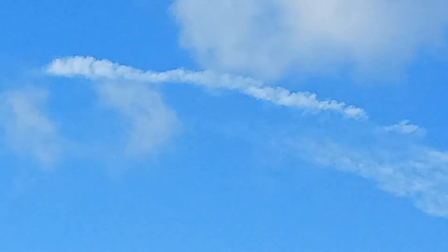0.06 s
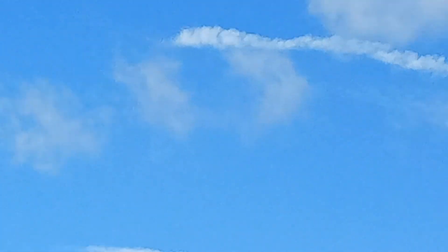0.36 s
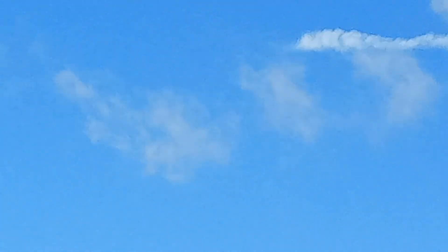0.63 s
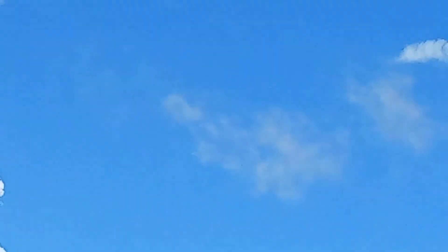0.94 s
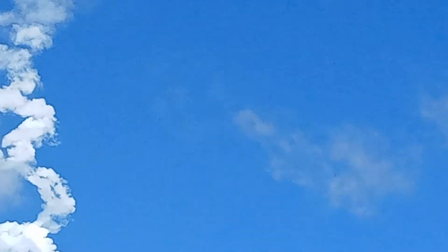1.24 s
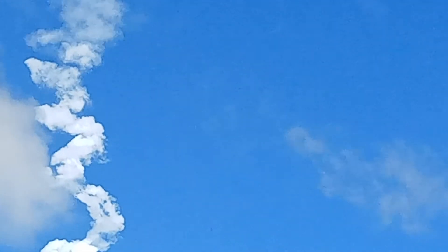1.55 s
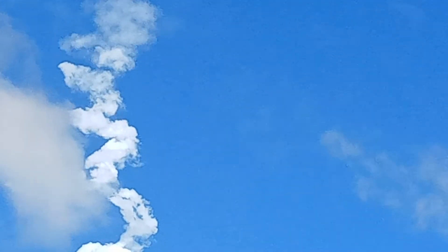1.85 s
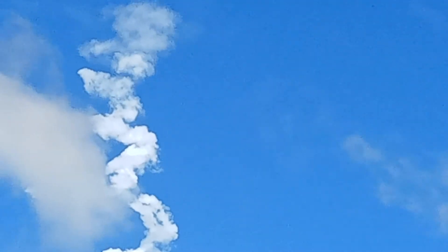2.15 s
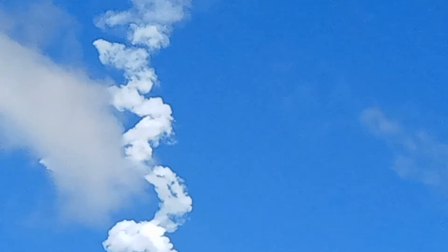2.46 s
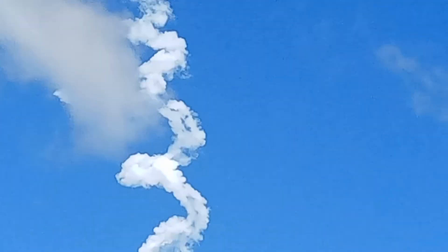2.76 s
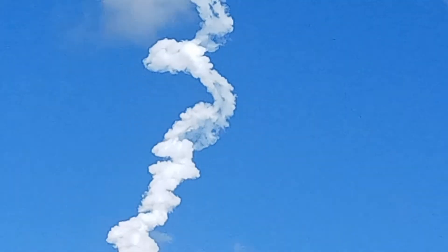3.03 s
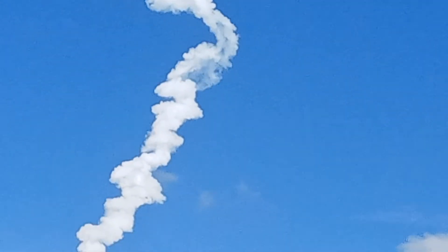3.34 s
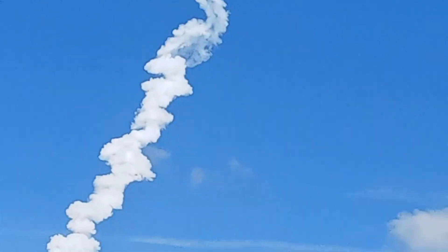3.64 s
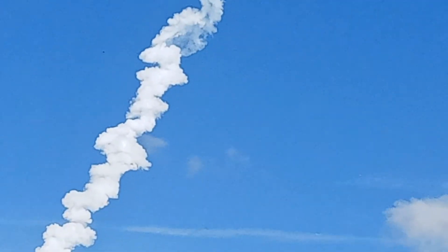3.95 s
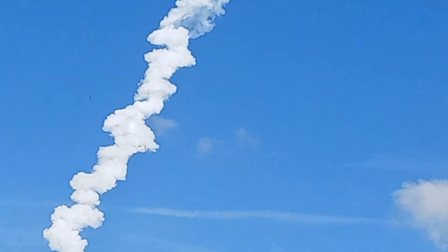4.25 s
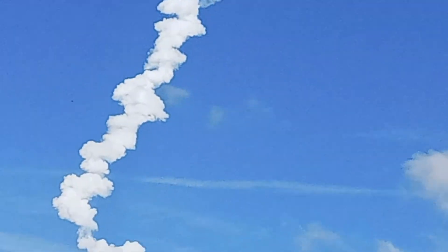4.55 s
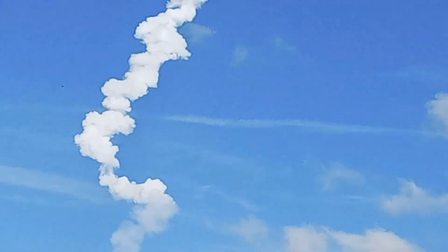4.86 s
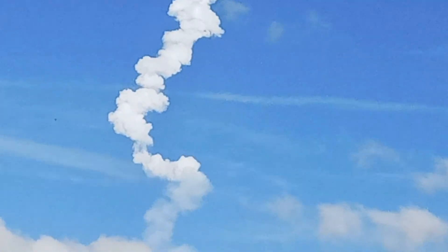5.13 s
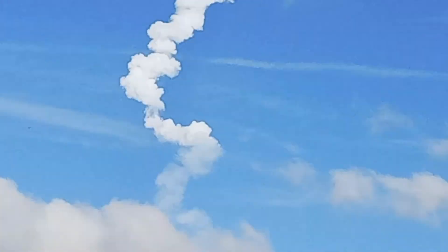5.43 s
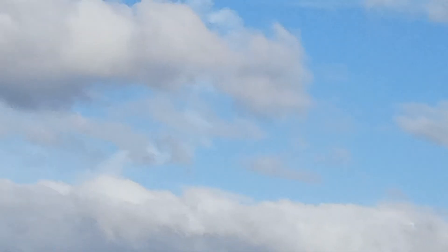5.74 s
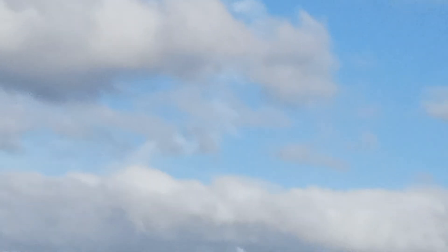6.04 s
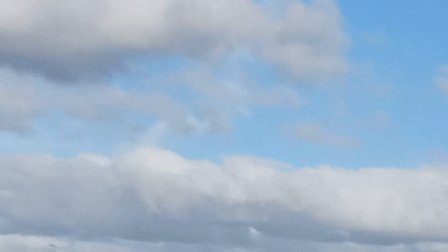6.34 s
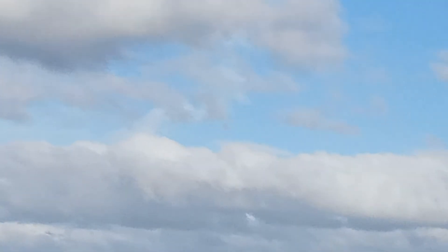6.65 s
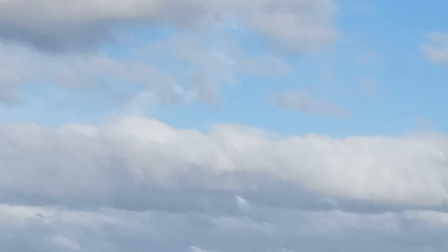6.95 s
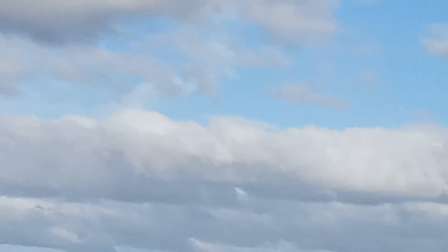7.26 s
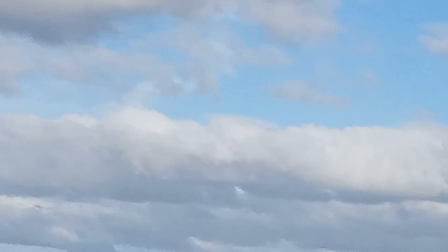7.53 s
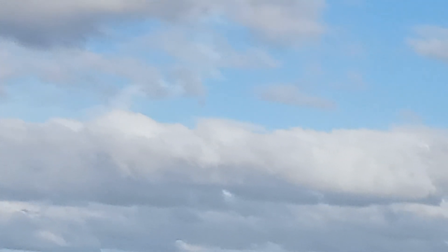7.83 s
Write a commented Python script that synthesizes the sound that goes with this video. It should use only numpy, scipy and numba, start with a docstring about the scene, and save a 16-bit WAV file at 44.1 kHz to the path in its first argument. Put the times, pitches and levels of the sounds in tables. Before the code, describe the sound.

A soft, steady rush like surf opens the scene outdoors and continues throughout. At about 0.5 seconds, wind hits the microphone with deep rumble, fluttering bursts and short, low slaps. It is loudest from 1 to 2.2 seconds, briefly pushing the background down. The buffeting thins out around 3 seconds, then builds again from 3.6 seconds, with another hard gust near 5 seconds. From about 5.5 to 7 seconds the wind falls away, leaving the wash of surf and a thin, airy hiss that grows a little brighter. Tiny, faint ticks touch the microphone near 3, 6.7 and 7.3 seconds. Around 7 seconds a quiet low drone comes in, rises slightly in pitch and holds with a small waver. Lighter gusts and gently swelling surf accompany it until the end at about 8 seconds.

```python
"""An open shore in gusty wind, heard through a hand-held phone.
Gusts ride on a breeze and buffet the microphone port: deep rumble, quick bursts, slaps from hard eddies.
Behind them a rush of surf slowly swells, air hisses across the case and three tiny contacts tick on it.
A low drone sets in near the end. The phone's gain control ducks the whole mix under strong gusts."""
import sys
import numpy as np
from scipy import signal
from scipy.fft import rfft, irfft
from scipy.io import wavfile
from scipy.ndimage import uniform_filter1d
from numba import njit

SR = 44100
rng = np.random.default_rng(int(sys.argv[2]) if len(sys.argv) > 2 else 0)


def to_wav(s):
    """Save 16-bit WAV."""
    ch = np.atleast_2d(s).T  # columns
    pcm = np.round(np.clip(ch, -1, 1) * 32767)  # PCM
    wavfile.write(sys.argv[1], SR, pcm.astype(np.int16))


N = 356769
TIME = np.arange(N) / SR
FREQS = np.maximum(np.arange(N // 2 + 1) * SR / N, 1)

# The breeze under the gusts. Each row: time in seconds, wind strength in dB.
BREEZE = [(0, -34.5), (.33, -35), (.43, -16.5), (1.1, -13), (1.65, -15.5), (2.35, -18), (2.5, -27),
          (3.0, -28.5), (3.45, -29.5), (3.85, -23.5), (4.85, -24.5), (5.3, -25), (5.75, -35.5),
          (6.35, -39.5), (7.0, -31), (7.35, -26.5), (8.09, -31)]
# Gusts on top of it. Each row: start in seconds, hold in seconds, wind strength in dB.
GUSTS = [(0.494, .08, -12.5), (0.683, 0.098, -15.5), (0.84, .09, -11), (0.988, 0.16, -3),
         (1.2, 0.098, -4.5), (1.336, 0.044, -9.5), (1.48, 0.052, -16), (1.716, 0.14, -9),
         (1.916, .04, -8.5), (2.072, 0.16, -6), (2.263, 0.091, -15), (2.427, 0.026, -18),
         (2.556, 0.019, -11), (2.658, 0.043, -14), (2.813, .04, -22), (3.1, 0.029, -19),
         (3.603, 0.13, -19.5), (3.918, 0.17, -15), (4.217, 0.022, -19.5), (4.313, 0.1, -18),
         (4.515, 0.039, -11), (4.641, 0.09, -13), (4.998, 0.051, -8), (5.097, 0.091, -9.5),
         (5.24, .14, -17), (5.536, 0.037, -28), (5.643, 0.02, -28.5), (6.47, 0.041, -29.5),
         (7.153, 0.071, -22), (7.413, 0.04, -18), (7.59, 0.033, -23.5), (7.802, 0.044, -20.5)]
# The hardest eddies. Each row: time in seconds, relative level in dB, centre frequency in Hz.
SLAPS = [(.512, 0, 460), (.564, 4, 415), (.613, -6, 550), (0.702, 3.5, 334), (0.754, 0, 280),
         (.798, -6, 580), (.846, 3, 413), (.868, -0.5, 403), (1.025, 9, 423), (1.213, 10, 340),
         (1.275, 10, 394), (1.303, 6, 343), (1.527, 2, 365), (1.559, 3, 334), (1.856, 5, 357),
         (1.953, -3, 350), (2.087, 0, 500), (2.175, 5.5, 363), (2.615, 0, 239), (2.656, -8, 496),
         (2.834, -6, 165), (3.132, -3, 370), (3.669, -5, 256), (3.928, -1, 279), (3.986, -2, 414),
         (4.055, 1, 364), (4.323, -6, 336), (4.405, -2, 276), (4.629, -4, 410), (4.962, 2, 320),
         (5.019, 7, 268), (5.169, 2, 330), (5.357, -7, 275), (6.35, -18, 128), (6.474, -14.5, 150),
         (7.202, -5.5, 265)]
# The surf's swell. Each row: time in seconds, level in dB, spray offset in dB, both before the trims.
SURF_SWELL = [(0, -24, -6), (.36, -27, -6), (.47, -29.5, -5), (.9, -23, -7.5), (1.45, -24, -4),
              (1.7, -24, -6), (2.2, -25.5, -7.5), (2.95, -25, -9), (3.5, -23, -10), (4.2, -27, -5.5),
              (4.9, -27, -7), (5.5, -26.5, -8.5), (6.4, -26.5, -8.5), (6.95, -21.5, -11),
              (7.28, -24, -10.5), (7.7, -20.5, -9.5), (8.09, -24, -8.5)]
# Air sliding over the case. Each row: time in seconds, relative level in dB.
HISS_LEVELS = [(0, -32), (.47, -32.5), (1.2, -29.5), (1.7, -28.5), (2.6, -31), (3.02, -29), (3.4, -29.5),
               (3.85, -34.5), (5.1, -33), (5.45, -31), (6.48, -31.5), (6.56, -25.5), (7.12, -24),
               (7.25, -27.5), (7.7, -23), (7.84, -27), (8.0, -24.5)]
# The low drone. Each row: time in seconds, pitch in Hz, relative level in dB.
DRONE = [(6.8, 82, -34), (7.05, 84.4, -23), (7.22, 93.9, -37), (7.28, 100, -16.5), (7.53, 104.1, -22),
         (7.7, 104.9, -24.5), (7.92, 105.1, -18), (8.09, 104.7, -24)]
# Dry ticks on the case. Each row: time in seconds, relative level in dB.
TICKS = [(2.99, -29), (6.657, -22), (7.282, -18)]
# EQ curves for the wind, wash, spray and hiss noises. Each row: frequency in Hz, relative gain in dB.
WIND_EQ = [(20, -30), (35, -45), (50, -15), (70, -6.5), (105, -0.5), (165, 1), (280, -4), (420, -10.5),
           (600, -18), (900, -25), (1400, -36.5), (2500, -54)]
WASH_EQ = [(100, -27), (300, -3), (550, -5), (850, -1), (1200, -3), (1750, 1), (2200, 1.5), (2700, -6.5),
           (3200, -17), (4500, -37.5)]
SPRAY_EQ = [(1800, -24), (2700, 0.5), (3300, -0.5), (3850, 1.5), (4500, -3.5), (5300, -11.5), (6500, -14.5),
            (9200, -6), (10500, -13), (14500, -15), (16000, -21)]
HISS_EQ = [(4500, -23), (5500, -12), (6200, -3.5), (6800, 1.5), (7500, -0.5), (8400, -6), (9400, -23),
           (11000, -24.5), (14500, -20), (16000, -27)]


def buffeting(rumble_db, wind_db, churn_db=3.5, trim_db=-2.0, brighten=0.3):
    """Turbulent pressure at the port: stronger gusts shed smaller eddies, which come in quick bursts."""
    pressure = noise_spectrum(WIND_EQ, (40, 160))
    churn = wander(rate=52)
    out = 0
    for hz in 100 * 2. ** np.arange(-2, 5):
        small = np.clip(np.log2(hz / 100) / 1.12, 0, 1)  # 0 = slow large eddies, 1 = fast small ones
        fine = np.clip(np.log2(hz / 300), 0, 1.5)  # the finest need the strongest gusts
        db = (1 - small) * rumble_db + small * (wind_db + trim_db)
        db += fine * brighten * (wind_db + 9.0)
        burst_db = churn_db * (0.62 + 0.74 * small) * (hz > 70)  # the deepest rumble stays even
        band = octave(pressure, hz)
        eddies = steady(band * undb(burst_db * churn))
        out = out + undb(db) * band.std() * eddies
    return out


def wind_level(attack_s=0.031, release_s=0.025):
    """Strength of the wind in dB: each gust swells, holds and dies away on top of the breeze."""
    breeze_db, = curves(BREEZE)
    power = undb(breeze_db) ** 2
    for start, hold, db in GUSTS:
        early = np.maximum(start - TIME, 0) / attack_s
        late = np.maximum(TIME - start - hold, 0) / release_s
        power += undb(db) ** 2 * np.exp(-2 * (early + late))
    return 10 * np.log10(power)


def rumble_level(wind_db, lag_s=0.033, base_db=-19, base_wind_db=-20, slope=0.59, limit_db=-13.5):
    """Large eddies build up late: their rumble trails the wind, grows more slowly and levels off."""
    trailing_db = np.interp(TIME - lag_s, TIME, wind_db)
    return np.minimum(base_db + slope * (trailing_db - base_wind_db), limit_db)


def slaps(trim_db=1.0, width_cycles=0.5, tear_s=0.0053, tear_band_hz=(450, 850)):
    """A vortex crosses the port: a pressure dip between two crests, wrapped in a short tearing flutter."""
    bandpass = signal.butter(2, tear_band_hz, "band", fs=SR, output="sos")
    tear = signal.sosfilt(bandpass, rng.standard_normal(N))
    tear /= tear.std()
    out = np.zeros(N)
    for s, db, hz in SLAPS:
        near = np.abs(TIME - s) < .03
        t = TIME[near] - s
        dip = -np.cos(2 * np.pi * hz * t) * np.exp(-(hz * t / width_cycles) ** 2)
        tear_db = db - 18.5 + 10 * np.log2(hz / 400)  # smaller, faster eddies tear more
        out[near] += undb(db + trim_db) * dip
        out[near] += undb(tear_db) * tear[near] * np.exp(-(t / tear_s) ** 2)
    return out


def surf(wash_trim_db=-1.5, spray_trim_db=-2.0, wash_flicker_db=0.41, spray_flicker_db=0.68):
    """Breaking water: a broad wash and the brighter fizz of spray, each flickering on its own."""
    swell_db, spray_offset_db = curves(SURF_SWELL)
    wash = irfft(noise_spectrum(WASH_EQ, (1100, 2600)), N)
    spray = irfft(noise_spectrum(SPRAY_EQ, (3000, 5000)), N)
    wash *= undb(wash_trim_db + wash_flicker_db * wander(rate=30))
    spray *= undb(spray_offset_db + spray_trim_db + spray_flicker_db * wander(rate=60))
    return undb(swell_db) * (wash + spray)


def air_hiss(trim_db=-2.0, flicker_db=0.7):
    """Air sliding over the case, coloured by the port's broad resonance near 7 kHz."""
    hiss_db, = curves(HISS_LEVELS)
    hiss = irfft(noise_spectrum(HISS_EQ, (6000, 8500)), N)
    return hiss * undb(hiss_db + trim_db + flicker_db * wander(rate=40))


def drone(hz, level_db, trim_db=-2.5, waver=.008, flutter_db=2.2):
    """A nearly pure low tone that rises, then holds with a slight waver."""
    phase = 2 * np.pi * np.cumsum(hz * (1 + waver * wander(rate=18))) / SR
    return np.sqrt(2) * np.sin(phase) * undb(level_db + trim_db + flutter_db * wander(rate=11))


def ticks(tick_s=0.0021):
    """Tiny contacts on the case, bright with the port's resonance."""
    grain = irfft(noise_spectrum(HISS_EQ, (6000, 8500)), N)
    return grain * sum(undb(db) * np.exp(-((TIME - s) / tick_s) ** 2) for s, db in TICKS)


def undb(db):
    """Decibels to gain."""
    return 10 ** (np.asarray(db) / 20)


def curves(table):
    """Automation curves, one for each column after the time, one value a sample."""
    times, *columns = np.transpose(table)
    return [np.interp(TIME, times, column) for column in columns]


def wander(rate):
    """Smooth random modulation with a spread of 1, heading for a new value rate times a second."""
    step = max(int(SR / rate), 2)
    held = np.repeat(rng.standard_normal(N // step + 2), step)
    shifted = held[rng.integers(step):][:N]
    smooth = uniform_filter1d(uniform_filter1d(shifted, step), step // 2)
    return smooth / smooth.std()


def noise_spectrum(eq, band_hz):
    """Spectrum of noise shaped by an EQ curve, with rms 1 inside the band."""
    hz, db = np.transpose(eq)
    gain = undb(np.interp(np.log(FREQS), np.log(hz), db))
    inside = (FREQS > band_hz[0]) & (FREQS < band_hz[1])
    return rfft(rng.standard_normal(N)) * gain / np.sqrt(np.mean((gain * inside) ** 2))


def octave(spectrum, hz):
    """One octave of a spectrum as sound, crossfading into its neighbours."""
    return irfft(spectrum * np.clip(1 - np.abs(np.log2(FREQS / hz)), 0, 1), N)


def steady(x, window_s=.09):
    """Hold the slow level at rms 1, keeping the quick bursts."""
    window = int(window_s * SR)
    power = uniform_filter1d(uniform_filter1d(x * x, window), window)
    return x / np.sqrt(power + 1e-12)


@njit
def follow(x, attack, release):
    """Envelope follower with separate rates for rising and falling."""
    out, level = np.empty(len(x)), 0.
    for i in range(len(x)):
        level += (abs(x[i]) - level) * (attack if abs(x[i]) > level else release)
        out[i] = level
    return out


def scene(drone_share=0.22):
    """The mono mix: wind up front, with surf, hiss, ticks and drone behind it."""
    wind_db = wind_level()
    rumble_db = rumble_level(wind_db)
    drone_hz, drone_db = curves(DRONE)
    # the rumble dips to make room for the drone
    rumble_share = 1 - drone_share * undb(drone_db - rumble_db) ** 2
    rumble_db += 10 * np.log10(np.clip(rumble_share, .3, 1))
    wind = buffeting(rumble_db, wind_db) + slaps()
    # surf and hiss flutter together, more so in strong gusts
    flutter_db = 0.63 * np.clip((wind_db + 35) / 15, 0, 2) * wander(rate=55)
    rush = (surf() + air_hiss()) * undb(flutter_db)
    return (wind + rush + ticks() + drone(drone_hz, drone_db))[None]


def record(dry, threshold_db=-11.0, knee=4, squeeze=0.73, attack_s=0.00043, release_s=0.042,
           ahead_s=0.01, ease_s=0.0068, makeup_db=1.29, ceiling=1.9, top_hz=15750):
    """Gain control looks ahead and ducks the mix under loud gusts; peaks are rounded, the top is cut."""
    envelope = follow(dry[0], 1 / (attack_s * SR), 1 / (release_s * SR))
    coming = np.interp(TIME + ahead_s, TIME, envelope)
    gain = (1 + (coming / undb(threshold_db)) ** knee) ** (-squeeze / knee)
    pole = np.exp(-1 / (ease_s * SR))
    eased_gain = signal.filtfilt([1 - pole], [1, -pole], gain)
    rounded = ceiling * np.tanh(dry * eased_gain * undb(makeup_db) / ceiling)
    lowpass = signal.ellip(10, .2, 80, top_hz, fs=SR, output="sos")
    return signal.sosfilt(lowpass, rounded)


dry = scene()
out = record(dry)
to_wav(out)
```